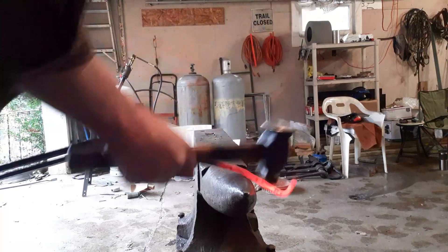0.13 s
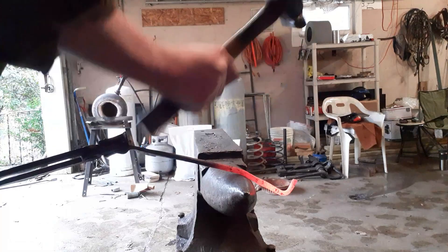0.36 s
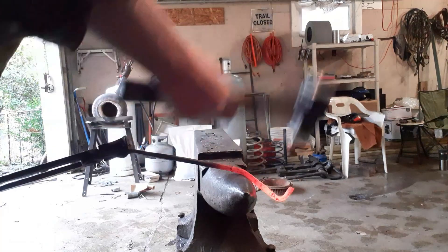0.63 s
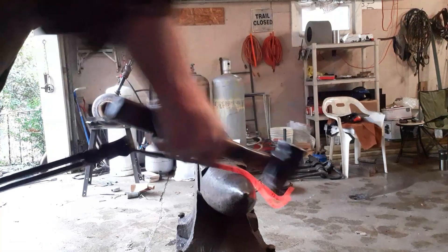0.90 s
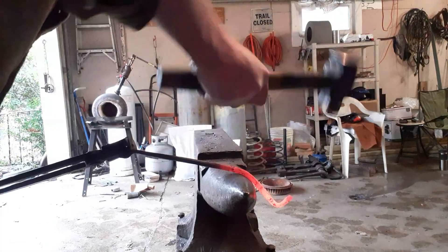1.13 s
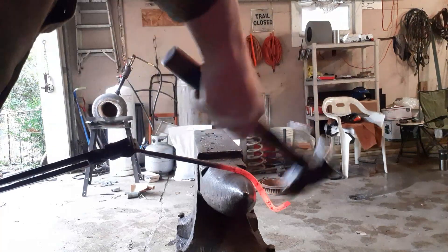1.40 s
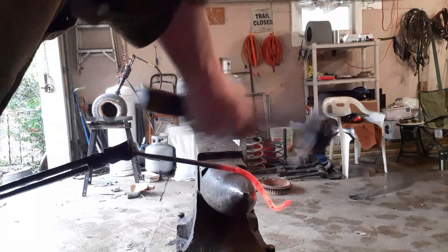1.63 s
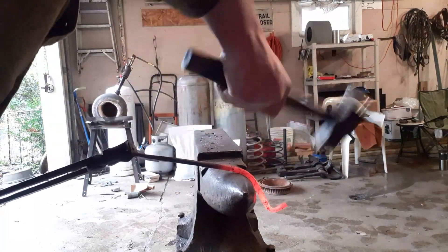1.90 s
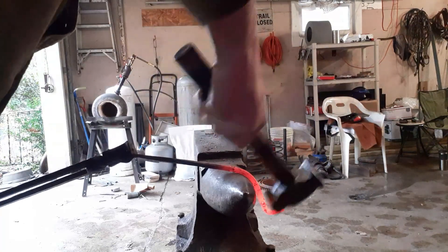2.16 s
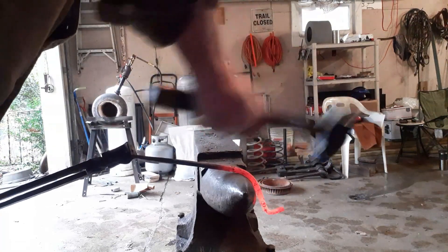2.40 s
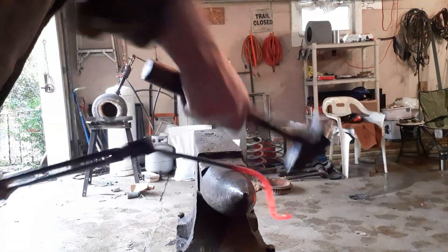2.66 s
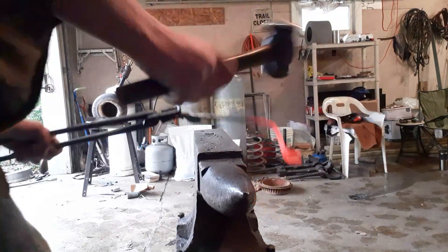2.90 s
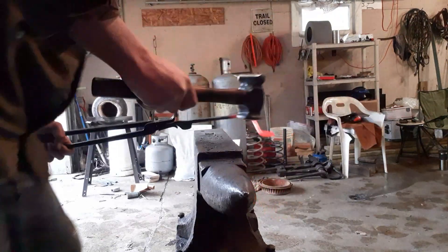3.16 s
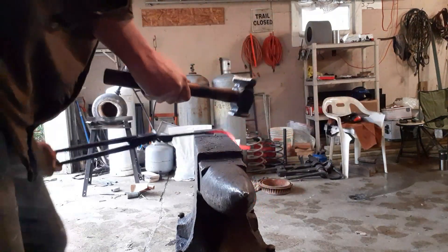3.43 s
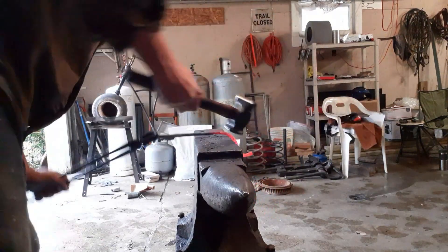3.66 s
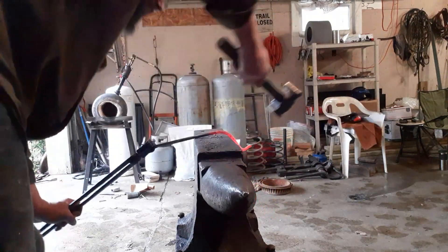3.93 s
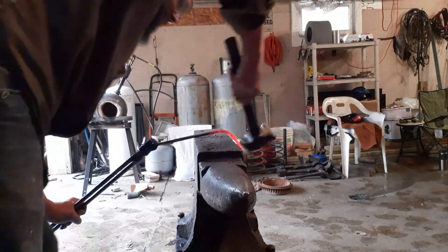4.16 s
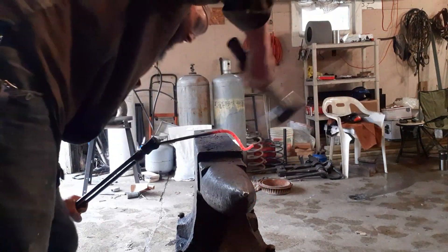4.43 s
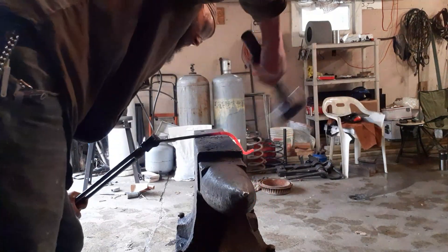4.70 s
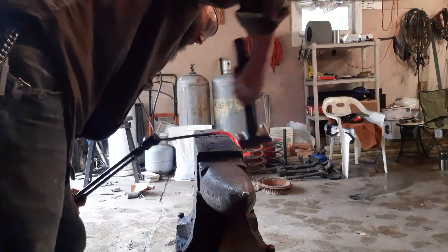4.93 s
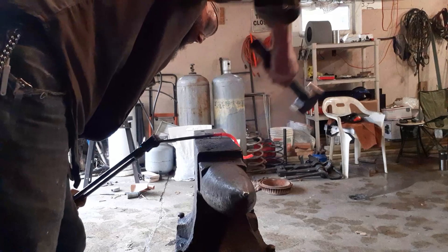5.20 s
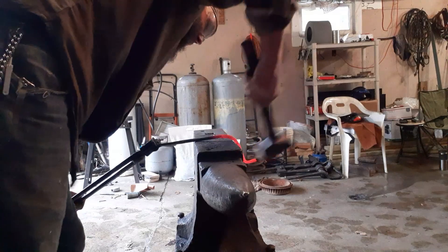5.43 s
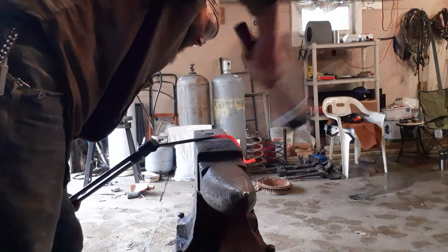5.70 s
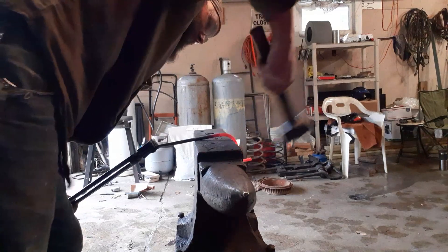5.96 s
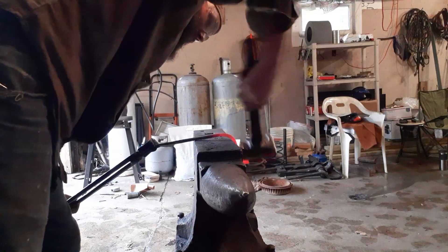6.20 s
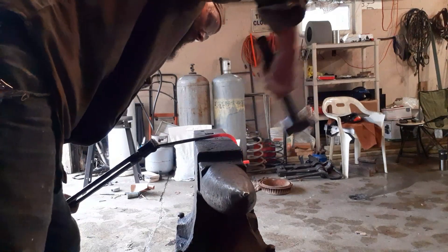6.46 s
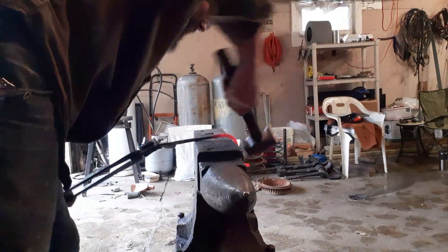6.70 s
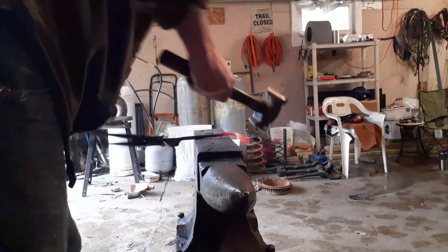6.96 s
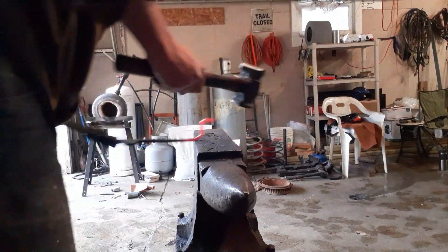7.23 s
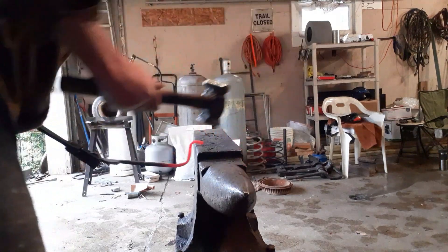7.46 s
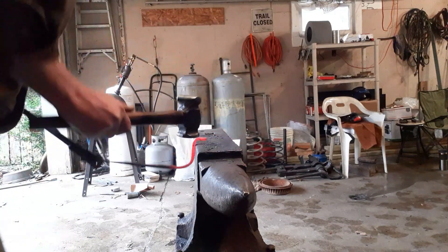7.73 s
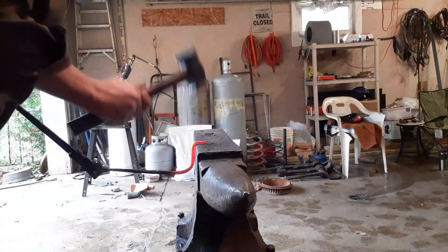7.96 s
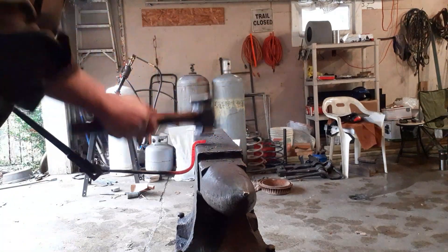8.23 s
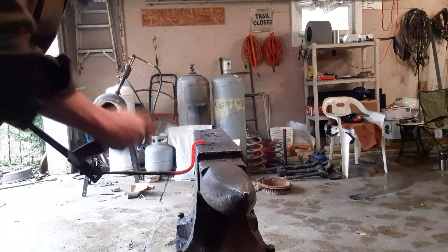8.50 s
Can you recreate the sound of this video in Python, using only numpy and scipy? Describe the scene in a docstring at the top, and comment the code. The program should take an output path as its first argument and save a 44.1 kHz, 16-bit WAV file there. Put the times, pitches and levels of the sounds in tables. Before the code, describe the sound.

A hand hammer strikes a hot steel rod on an anvil in spaced runs of sharp, clanking blows, with light scrapes between, in a concrete garage.

```python
"""A faint hush runs throughout, as noise of a given spectrum; over it a hand hammer bends a hot steel rod
on an anvil. Each blow is a broadband pulse (the crack), a falling swing of air, and damped modes of the floor,
the stand, the rod, the anvil and the hammer head; a concrete garage draws it out with decaying noise.
Light touches of rod and tongs tick as pulses; feet and rod scuff and drag as grainy noise
that keeps stand, rod and anvil faintly sounding. A microphone with two ports hears it all."""
import sys
import numpy as np
from scipy import signal
from scipy.fft import rfft, irfft
from scipy.io import wavfile

SR = 44100
rng = np.random.default_rng(int(sys.argv[2]) if len(sys.argv) > 2 else 0)


def transcribe(u):
    """Save the signal u as a 16-bit wav file named by the first command-line argument.

    u: samples, shape (n,) or (channels, n), limited to [-1, 1]; the rate is SR.
    q: integer samples, one column per channel.
    """
    v = np.clip(np.atleast_2d(u).T, -1, 1)
    q = np.round(v * 32767).astype(np.int16)
    wavfile.write(sys.argv[1], SR, q)


N = 379701

# Spectrum of the hush. Each row: frequency in Hz, relative density in dB per Hz.
HUSH_SPECTRUM = [(18, -19), (30, -12.5), (81, -1.5), (426, -15.5), (616, -16.5), (801, -16), (1220, -32.5),
                 (1720, -20.5), (3220, -29.5), (7090, -29), (16000, -35)]
# Slow rise and fall of the hush. Each row: time in seconds, level change in dB.
HUSH_SWELL = [(0, -0.5), (1.001, 6), (1.998, -3.5), (4, 0.5), (5.002, 0.5), (6.199, -10), (6.999, 0),
              (8.6, 0.5)]
HUSH_DB = -66.5  # rms before the swell and the port balance

# Likeness of the two ports. Each row: frequency in Hz, shared part of the amplitude from 0 to 1.
PORT_LIKENESS = [(60, .85), (150, .85), (400, 0.96), (800, 0.4), (1600, 0.7), (3000, 0.6), (6000, 0.55),
                 (15000, .3)]
# Phase between the ports. Each row: frequency in Hz, lead of the left in radians.
LEFT_LEAD = [(60, 1.1), (150, 0.8), (400, 0.12), (800, 0.3), (1600, -1.4), (3000, -1.2), (6000, -1.7),
             (15000, -1.5)]
# Balance of the ports. Each row: frequency in Hz, left over right in dB.
PORT_BALANCE = [(60, -4.2), (180, -2.5), (400, 1.2), (1500, 1.4), (3000, 0), (6000, .5), (10000, -.4),
                (14000, -2.2)]
# Reverberation of the garage. Each row: frequency in Hz, t60 in seconds.
GARAGE_T60 = [(60, 0.64), (160, 0.44), (420, 0.43), (1100, 0.46), (2900, 0.42), (7700, 0.36), (15000, 0.27)]

# Blows. Each row: start in seconds, place struck, crack energy above 4 kHz in dB, air push in dB
# before the side balance, squareness in dB (anvil low ring against the crack before mixing).
BLOWS = [(0.162, "horn tip", 8, -13, -6.5), (0.5445, "horn tip", 9, -12, -12),
         (0.9372, "horn tip", 6.5, -19.5, -14), (1.087, "horn", -9.5, -45, -1.5),
         (1.14, "horn", -25, -52, -3), (1.3286, "horn", 7.5, -22, -12.5), (1.715, "horn", 7.5, -15, -9.5),
         (2.1187, "horn", 10, 4.5, -5.5), (2.5026, "horn", 11.5, -39, -3.5),
         (3.4502, "edge near heel", 4, -33, -19), (4.128, "edge through rod", 12.5, -28, -28.5),
         (4.151, "edge through rod", 5.5, 1.2, -13.5), (4.537, "edge through rod", 10.5, -35, -19),
         (4.9344, "edge near horn", 9.5, -16.5, -20.5), (5.3477, "bare edge", -4.5, -42, 1.1),
         (5.3574, "bare edge", 14, -24.5, -3), (5.793, "edge near horn", 9.5, -28.5, -14),
         (6.2218, "edge through rod", 7.5, -1.5, -14.5), (6.6194, "edge near horn", 12.5, -29, -8),
         (7.441, "edge near horn", -9, -40, -17.5), (7.616, "face", -33, -42, 18.5),
         (8.245, "face", 9.5, -22, 4.5), (8.5937, "face", 12.5, 0.5, 3.2)]
# Names of the places struck, in the order of the columns below: horn, far edge through the rod,
# bare far edge, face, edge near the heel, edge near the horn, horn tip.
PLACES = ["horn", "edge through rod", "bare edge", "face", "edge near heel", "edge near horn", "horn tip"]
FACE = 3  # index of the face among the places
# Kind of contact at each place, as an index: 0 horn, 1 edge, 2 bare edge, 3 face, 4 horn tip.
CONTACT = [0, 1, 2, 3, 1, 1, 4]
# Response of the bodies, a row per place. Each row, against the crack before squareness and mixing:
# floor in dB, stand in dB, rod in dB, anvil high ring in dB, edge-blow ring in dB.
REACH = [(-29, -5.5, -6.5, -17, -26.5), (-29, -5.5, -17.5, -6.5, -7), (-32, -18, -31.5, 4.5, -9),
         (-25, -2.5, -6.5, -1.5, -10), (-26, -3, -13.5, 2.5, -41), (-32, -8, -15.5, -14, -6),
         (-20.5, -0.3, -7, -10, -19.5)]
# Gain in dB per dB of squareness for floor, stand, rod, anvil high ring and edge-blow ring, in that order.
SQUARE_SHARES = [-0.16, 0.36, 0.19, .3, 0.65]
# Spectrum of the crack. Each row: frequency in Hz, then relative density in dB per Hz
# on horn, edge, bare edge, face and horn tip.
CRACK_SPECTRUM = [(150, -26, -10.5, -27.5, -3.5, -4), (293, -35, -26.5, -15, -5.5, -24.5),
                  (660, 6.5, 0.5, 2, 18.5, 11.5), (820, 5.5, 3.9, 8.5, 17.5, 22),
                  (1400, 13, -6.5, 7, 21.5, 13), (1960, 0, 1, 6, 13, 6.5), (2180, 2.5, 2.3, 8, 13, 9),
                  (3380, -1, 1, 8, 2.5, 5), (4100, 3, 3.6, 6.5, 3, 4.4), (7100, 2.5, 6, -0.5, 3, 4.6),
                  (8650, -0.4, 2.5, -3, 0, 6.5), (12800, 1.5, 1.5, -3.5, 6.5, 6.5),
                  (16500, -9.5, 3, 0.5, 1.5, 2.1)]

# Modes of the floor. Each row: frequency in Hz, relative energy in dB, t60 in seconds.
FLOOR_MODES = [(49.6, -7.5, 0.056), (71, -3, 0.1), (129, -1, 0.3)]
# Modes of the stand. Each row: frequency in Hz, relative energy in dB, t60 in seconds.
STAND_MODES = [(427.6, -11.5, 0.25), (446.7, -6, 0.15), (439.8, -3, 0.18), (477.4, -12, 0.094)]
# Modes of the struck rod. Each row: frequency in Hz, relative energy in dB, t60 in seconds.
ROD_MODES = [(895, -23.5, 0.046), (980, -19, 0.064), (1120, -33.5, 0.057), (1278, -8.5, 0.15),
             (1230, 0.5, 0.032), (1338, -2.5, 0.038)]
# Modes that sideways blows on the edge set ringing, in stand and rod.
# Each row: frequency in Hz, relative energy in dB, t60 in seconds.
EDGE_BLOW_MODES = [(389, -16, 0.21), (397, -8, 0.3), (422.5, -2, 0.2), (1117, -8, 0.23), (1159, -4.5, 0.19)]
# Low ring of the anvil. Each row: frequency in Hz, relative energy in dB, t60 in seconds.
LOW_RING = [(1564.4, 0.00098, 0.31)]
# Frequencies of the anvil's high modes in Hz.
HIGH_HZ = [2060, 2136, 2180, 2648, 2961, 3135, 3535, 3668]
# High ring of the anvil, a row per frequency above. Each row: t60 in seconds, then relative energy in dB
# at each place.
HIGH_RING = [(0.062, -22, -33.5, -15, -22, -38, -25.5, -22.5),
             (0.065, -6.5, -30.5, -4.5, -3, -46, -4, -8.5), (0.25, 1, -11.5, -11.5, -2.5, -6, -1, -11.5),
             (0.22, 5, -2, -17.5, -9.5, -3.5, -12.5, -9), (0.097, -14, -10.5, -5.5, -17.5, -22, -10, -20),
             (0.074, 0, -9, -21, -12.5, -33, -9, -15), (0.53, -12, -14.5, -22.5, -21.5, -11, -13.5, -20),
             (0.11, -20.5, -25, -11, -24, -42, -19.5, -28)]
# Frequencies of the hammer head's modes in Hz.
HEAD_HZ = [4750, 5130, 6338, 10172, 11620]
# Ring of the hammer head, a row per frequency above. Each row: t60 in seconds, then energy in dB against
# the crack, before mixing, on horn, edge, bare edge, face and horn tip.
HEAD_RING = [(0.021, -31.5, -19, -10, -7.5, -17.5), (0.029, -13, -26.5, -20.5, -19.5, -36),
             (0.33, -23, -21, -24, -17.5, -21), (0.3, -20.5, -26, -27.5, -28, -11),
             (0.24, -13.5, -23.5, -28.5, -18, -21.5)]
PUSH_LAG_S = 0.0025  # the air reaches the right port later

# Light touches of rod and tongs. Each row: start in seconds, pulse level in dB before the room, centre in Hz.
TICKS = [(0.818, -34, 5860), (0.87, -29, 3500), (1.2915, -60, 6930), (2.7919, -18, 2370),
         (2.839, -19.5, 6600), (3.018, -34, 3180), (3.0385, -20, 2150), (3.102, -25, 2500),
         (3.2618, -25, 4430), (3.3885, -25.5, 5030), (3.426, -43, 2500), (3.698, -35, 4870),
         (4.391, -44, 2570), (7.0637, -36, 6640), (7.146, -27, 6930), (7.3481, -28.5, 3000),
         (7.913, -39, 7460)]
# Strokes of scuffing and dragging. Each row: strongest moment in seconds, swell in seconds, fade in seconds,
# grit in dB and stand in dB, both before the room.
SCUFFS = [(2.835, 0.094, 0.019, -50, -61.5), (3.042, 0.038, 0.092, -41.5, -52),
          (3.11, .06, 0.23, -50.5, -61.5), (3.267, .015, 0.013, -41, -70), (3.41, 0.038, 0.065, -62, -70),
          (3.73, 0.039, 0.055, -37.5, -53), (3.799, 0.049, 0.091, -54.5, -53),
          (3.902, 0.041, 0.032, -54.5, -56), (4.061, 0.049, 0.084, -54, -77.5),
          (7.11, .2, 0.25, -61, -64.5), (7.249, 0.084, 0.1, -61, -70), (7.502, 0.09, 0.17, -54, -63.5),
          (7.9, 0.069, 0.055, -68.5, -62), (8.148, .2, 0.095, -56.5, -69.5)]
# Spectrum of the scuffing grit. Each row: frequency in Hz, relative density in dB per Hz.
GRIT_SPECTRUM = [(59, -54), (100, 8), (302, -1), (381, -23.5), (535, 3), (1250, 3), (2130, 6), (7450, 0),
                 (16000, -8)]
# The rod as it is dragged. Each row: frequency in Hz, relative energy in dB, t60 in seconds.
DRAG_RING = [(814, 1.5, 0.11)]
STROKE_DB, STROKE_ANVIL_DB = 13.5, -5  # gained over the swell and lost over the fade; anvil against the stand

CEILING, EDGE_HZ = 0.9, 15800  # amplitude limit of the input stage; upper band edge of the microphone


def gain_of(db):
    """The decibel law: 20 dB is a factor of ten in amplitude."""
    return 10 ** (np.asarray(db) / 20)


def evened(x):
    """Normalisation by mean power: scales to rms 1."""
    return x / np.sqrt(np.mean(x ** 2) + 1e-20)


def read(points, hz):
    """Interpolation of a spectrum on a logarithmic frequency axis."""
    f, value = np.transpose(points)
    return np.interp(np.log(hz + 1), np.log(f + 1), value)


def add(mix, s, sound):
    """Superposition: sound pressures add, here from a time in seconds."""
    part = mix[..., round(s * SR):][..., :sound.shape[-1]]
    part += sound[..., :part.shape[-1]]


def coloured(points, count):
    """Spectral shaping of white noise by multiplication in frequency."""
    hz = np.fft.rfftfreq(count, 1 / SR)
    white = rfft(rng.standard_normal(count))
    return evened(irfft(white * gain_of(read(points, hz)), count))


def ports(left, other):
    """Partial coherence: two microphone ports share part of the field, with their own balance and phase."""
    count = len(left)
    hz = np.fft.rfftfreq(count, 1 / SR)
    same = np.clip(read(PORT_LIKENESS, hz), 0, 1)
    tilt = gain_of(read(PORT_BALANCE, hz) / 2)
    a, b = rfft(left), rfft(other)
    shared = same * a * np.exp(-1j * read(LEFT_LEAD, hz))
    right = shared + np.sqrt(1 - same ** 2) * b
    return irfft(np.array([a * tilt, right / tilt]), count)


def hush():
    """Noise of fixed spectrum, partly coherent between the ports, under a slow change of level."""
    swell_db = np.interp(np.arange(N) / SR, *np.transpose(HUSH_SWELL))
    return gain_of(HUSH_DB + swell_db) * ports(coloured(HUSH_SPECTRUM, N), coloured(HUSH_SPECTRUM, N))


def garage(wet_db, early_db=9, early_s=0.00042, beam_hz=1200):
    """Reverberation: direct sound and close echoes, then noise decaying band by band, new at each call."""
    t = np.arange(30000) / SR
    lead = 40  # samples of room ahead of the direct sound for the port phases
    hz, frame_s, z = signal.stft(rng.standard_normal((2, len(t))), SR, nperseg=512)
    decay = gain_of(-60 * frame_s / read(GARAGE_T60, hz)[:, None])
    tails = signal.istft(z * decay, SR, nperseg=512)[1][:, :len(t)]
    after_direct = t > lead / SR
    tails = gain_of(wet_db) * tails * after_direct / np.linalg.norm(tails[0])
    near = tails * gain_of(early_db) * np.exp(-t / early_s)
    near[:, lead] += 1  # the direct sound
    # small steel parts send little bass straight over
    near = signal.lfilter(*signal.butter(1, beam_hz, "high", fs=SR), near)
    return np.roll(ports(*(tails + near)), -lead, 1) * (t < 0.6)


def heard(x, room):
    """Convolution of a dry sound with the impulse response of the room."""
    return signal.fftconvolve(x[None], room, axes=1)


def snap(points):
    """Minimum phase: a causal pulse of unit energy whose phase follows from its log spectrum."""
    log_gain = np.log(gain_of(read(points, np.fft.rfftfreq(2048, 1 / SR))))
    mirrored = np.r_[log_gain, log_gain[-2:0:-1]]
    log_spectrum = signal.hilbert(mirrored).conj()
    pulse = np.fft.ifft(np.exp(log_spectrum)).real[:1024]
    return pulse / np.linalg.norm(pulse)


def crack(contact, db, room):
    """Impulsive contact: one sharp pulse, coloured by the contact and scaled by its treble energy."""
    sound = heard(snap([(row[0], row[1 + contact]) for row in CRACK_SPECTRUM]), room)
    treble = signal.sosfilt(signal.butter(4, 4000, "high", fs=SR, output="sos"), sound)
    return gain_of(db) * sound / np.sqrt((treble ** 2).sum(1).mean())


def push(db):
    """Air displacement: a damped swing of falling pitch, with no echo, stronger and later on the right."""
    t = np.maximum(np.arange(3000) / SR - np.array([[0], [PUSH_LAG_S]]), 0)
    hz = (55 + 220 * np.exp(-t / 0.0023)) * (t > 0)
    swing = -np.sin(2 * np.pi * np.cumsum(hz, 1) / SR) * np.exp(-t / 0.011)
    sides = gain_of([[db - 3], [db + 2]])  # left, right
    return sides * swing / np.linalg.norm(swing[0])


def ring(modes, db, room):
    """Modal decay: damped sines, each scaled to the energy with which it arrives through the room."""
    t = np.arange(24000) / SR
    hz, mode_db, t60 = np.transpose(modes)[:, :, None]
    # the room's power gain, weighted by the resonance curve of each mode
    near = 1 / ((np.fft.rfftfreq(room.shape[1], 1 / SR) - hz) ** 2 + (1.1 / t60) ** 2)
    passed = near @ (abs(rfft(room)) ** 2).mean(0) / near.sum(1)
    sines = gain_of(-60 * t / t60) * np.sin(2 * np.pi * hz * t)
    return (gain_of(db + mode_db[:, 0]) / np.sqrt(passed * (sines ** 2).sum(1))) @ sines


def struck_at(column, hz, rows):
    """Modal excitation: the point or kind of contact sets the energy of each mode (Hz, dB, t60)."""
    return [(f, row[1 + column], row[0]) for f, row in zip(hz, rows)]


def dull_bodies(floor_db, stand_db, rod_db, edge_blow_db, room):
    """Free vibration after a knock: floor, stand and rod sound in their own modes."""
    knocked = ring(FLOOR_MODES, floor_db, room) + ring(STAND_MODES, stand_db, room)
    return knocked + ring(ROD_MODES, rod_db, room) + ring(EDGE_BLOW_MODES, edge_blow_db, room)


def anvil(place, low_db, high_db, room):
    """Free vibration of a steel block: a low ring and high modes weighted by the place."""
    return ring(LOW_RING, low_db, room) + ring(struck_at(place, HIGH_HZ, HIGH_RING), high_db, room)


def hammer_head(contact, db, room):
    """Free vibration of a small steel body: high modes weighted by the kind of contact."""
    return ring(struck_at(contact, HEAD_HZ, HEAD_RING), db, room)


def blow(where, crack_db, push_db, square_db):
    """Impact: one blow excites every body at once; a squarer one sends more into anvil and stand."""
    place = PLACES.index(where)
    contact = CONTACT[place]
    room, close = garage(4.9, early_db=8, early_s=0.0017), garage(3.5)
    body_db = crack_db + np.array(REACH[place]) + square_db * np.array(SQUARE_SHARES)
    floor_db, stand_db, rod_db, high_db, edge_blow_db = body_db
    dull = dull_bodies(floor_db, stand_db, rod_db, edge_blow_db, room)
    steel = anvil(place, crack_db + square_db, high_db, close)
    head = hammer_head(contact, crack_db, close)
    # steel arrives drier
    sound = heard(dull, room) + heard(gain_of(-2.5) * steel + gain_of(-5.5) * head, close)
    # hammer head and anvil also ring straight into both ports
    add(sound, 0, gain_of(-5.5) * head + gain_of(-6.5) * steel)
    add(sound, 0, crack(contact, crack_db, room))
    add(sound, 0, push(push_db))
    return sound


def tick(db, hz):
    """Light impact: a small broadband pulse, strongest about its centre frequency."""
    pulse = snap([(hz / 4, -12), (hz, 0), (hz * 3, -8)])
    return heard(gain_of(db) * pulse, garage(1.7, early_db=20))


def scuff(s, swell_s, fade_s, grit_db, stand_db):
    """Friction: grainy noise swells and fades, heard as grit and driving stand, rod and anvil."""
    t, room = np.arange(-swell_s, fade_s, 1 / SR), garage(-1.2, early_db=39.0)
    stroke = gain_of(-STROKE_DB * np.maximum(-t / swell_s, t / fade_s))
    grains = np.repeat(gain_of(0.8 * rng.exponential(1, SR // 100)), 100)  # a new strength every 100 samples
    rubbing = evened(rng.standard_normal(SR) * grains)[:len(t)]
    shake = rubbing * stroke * signal.windows.tukey(len(t), 0.2)
    steel = anvil(FACE, 0, -10.5, room) + ring(DRAG_RING, 0, room)
    driven = ring(STAND_MODES, stand_db, room) + gain_of(stand_db + STROKE_ANVIL_DB) * steel
    sound = signal.fftconvolve(shake, driven)
    add(sound, 0, np.convolve(gain_of(grit_db) * shake, snap(GRIT_SPECTRUM)))
    return s - swell_s, heard(sound, room)


def scene():
    """Superposition of blows, ticks and scuffs over the hush."""
    mix = hush()
    for s, *row in BLOWS:
        add(mix, s, blow(*row))
    for s, *row in TICKS:
        add(mix, s, tick(*row))
    for row in SCUFFS:
        add(mix, *scuff(*row))
    return mix


def roll_off(x):
    """The treble ends steeply here."""
    return signal.sosfilt(signal.butter(12, 16970, fs=SR, output="sos"), x)


def record(dry):
    """Band limiting and saturation: bass roll-off, rounded peaks and upper band edge of the microphone."""
    cut = signal.sosfilt(signal.butter(4, 50, "high", fs=SR, output="sos"), dry)
    rounded = CEILING * np.tanh(cut / CEILING)
    edge = signal.firwin(129, EDGE_HZ, window=("kaiser", 4), fs=SR)
    finished = signal.oaconvolve(rounded, edge[None], "same")
    return roll_off(finished)


dry = scene()
out = record(dry)
transcribe(out)
```